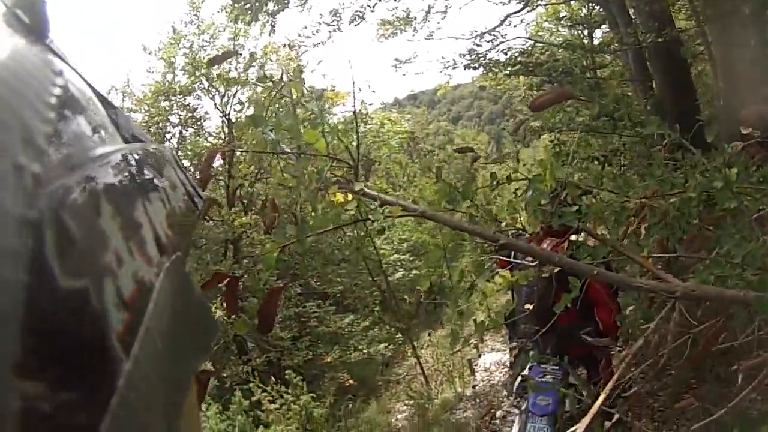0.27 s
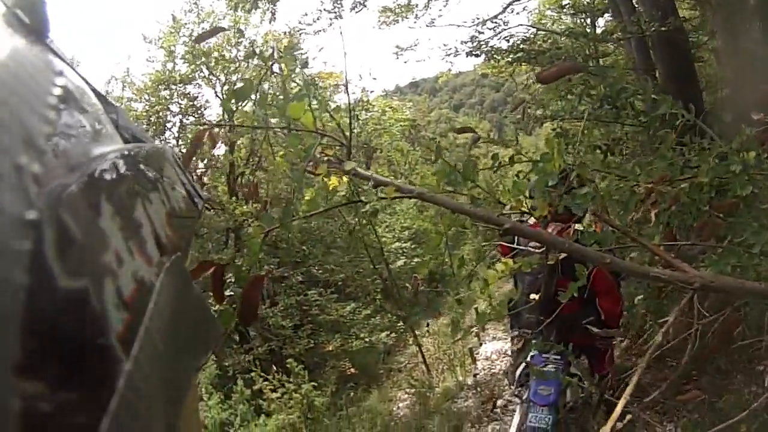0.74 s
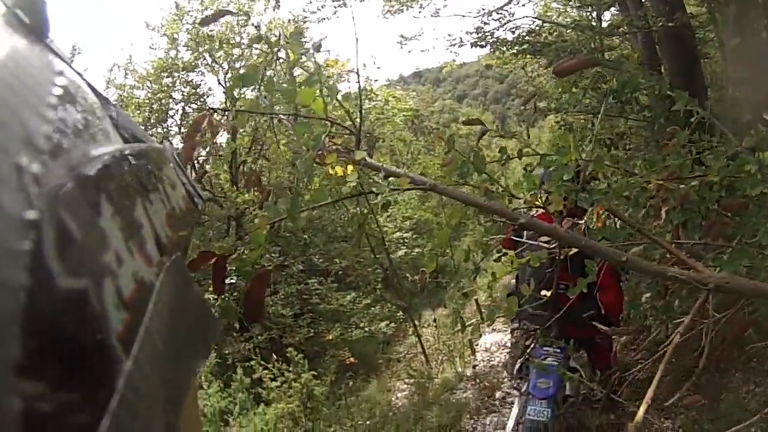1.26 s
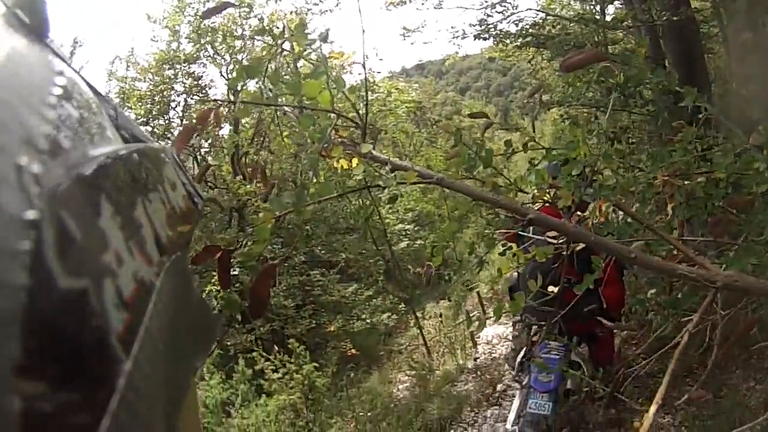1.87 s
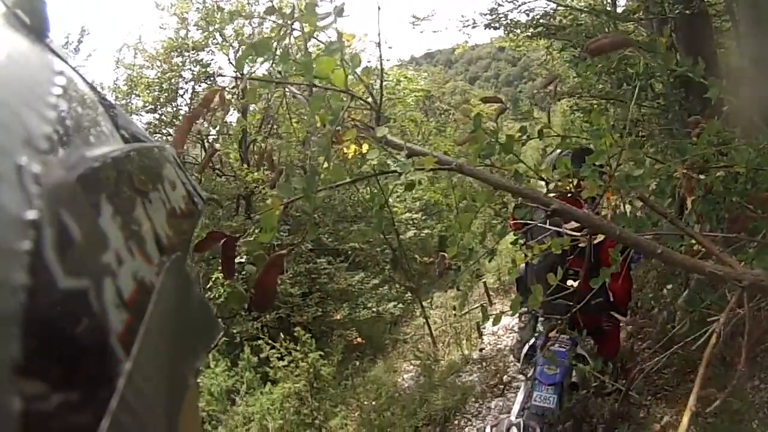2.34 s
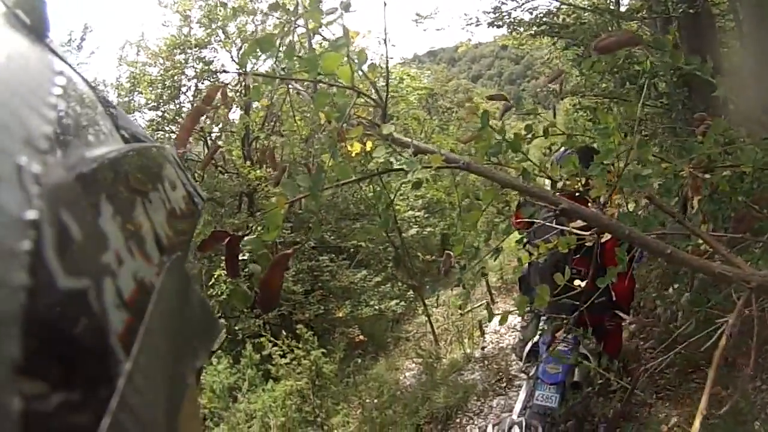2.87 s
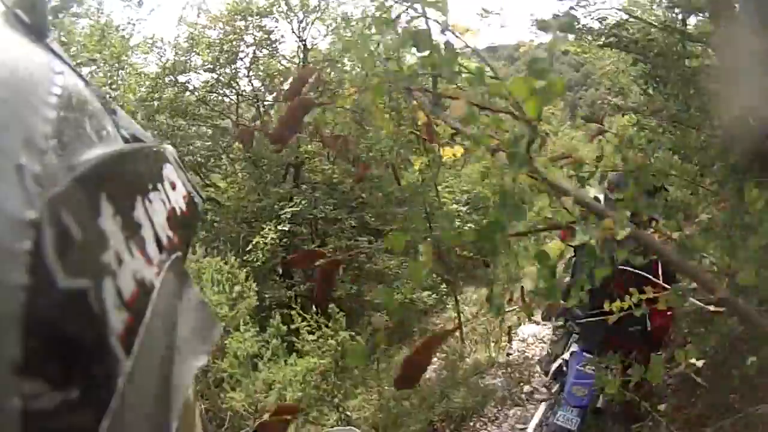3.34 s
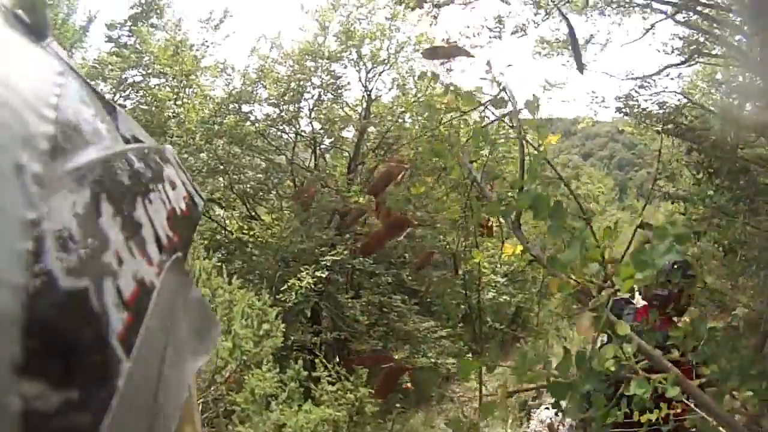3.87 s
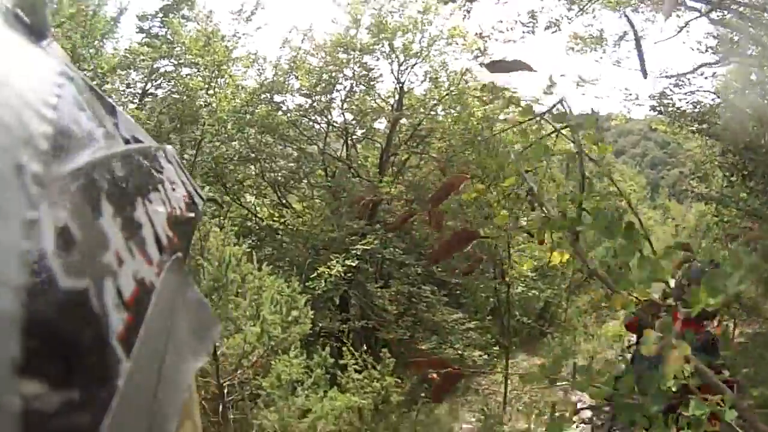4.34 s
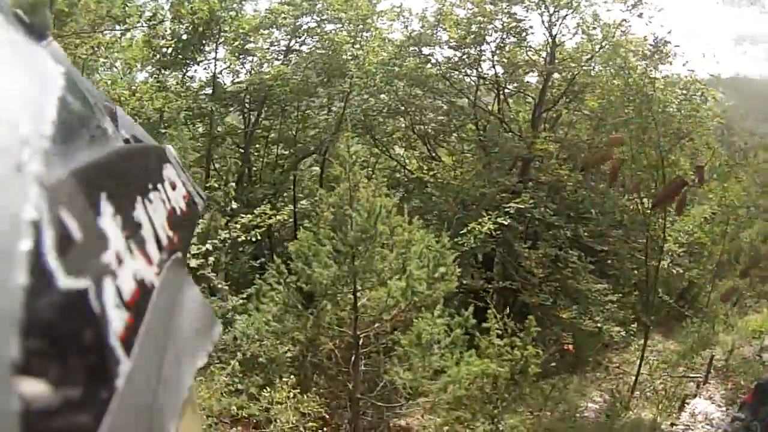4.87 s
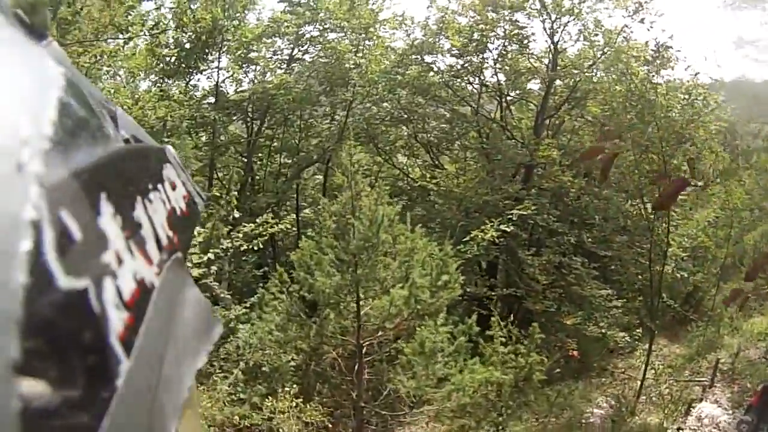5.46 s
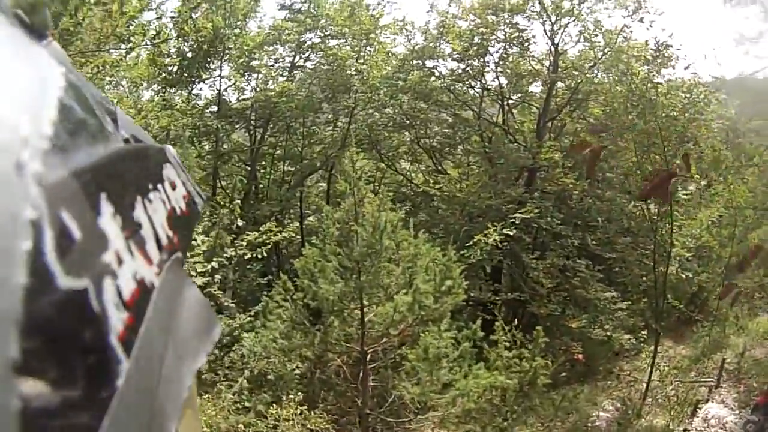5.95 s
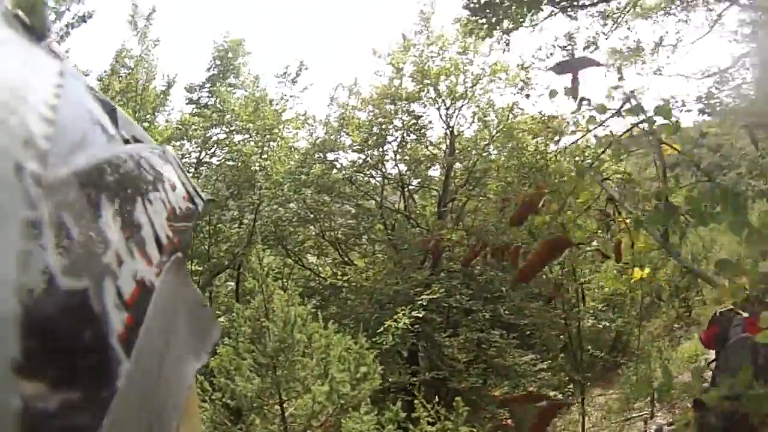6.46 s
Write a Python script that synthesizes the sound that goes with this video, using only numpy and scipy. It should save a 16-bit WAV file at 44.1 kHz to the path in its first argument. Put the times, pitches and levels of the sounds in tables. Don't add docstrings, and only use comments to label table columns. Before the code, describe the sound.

A single microphone in a closed plastic case picks up a steady, dull hiss and a barely audible electronic whine around 600 Hz. Weak ticks touch the helmet at 0.2 to 0.4 seconds; around 1.15 to 1.25 a light tap and a sharper click come with a quick leaf flick. Hiss alone continues until soft knocks at 3.2 to 3.4 and a faint approaching rustle. From 3.9 to 4.3 knocks cluster with brushing leaves and a light tug. Between 4.4 and 4.9 it grows loud: sharp snaps, a hard stuttering scrape near 4.7, low rumble and a heavy hollow knock at 4.89. From 5 to 6.1 only slightly brighter hiss and whine remain. At 6.2 snaps and a faint scrape return, with dense hard cracks from 6.3 to 6.5, leafy ticking and rumble, and one last crack near 6.7. Everything is close, dry and coarse, with limited treble.

```python
import sys
import numpy as np
from scipy import signal
from scipy.io import wavfile
from scipy.ndimage import uniform_filter1d

SR = 44100
rng = np.random.default_rng(int(sys.argv[2]) if len(sys.argv) > 2 else 0)


def nominal_scale(level):
    x = np.asarray(level, float) / 20
    return 10 ** x


def put_to_file(sound):
    columns = np.atleast_2d(sound).T
    safe = np.clip(columns, -1, 1)
    whole_steps = np.round(safe * 32767)
    wavfile.write(sys.argv[1], SR, whole_steps.astype(np.int16))


N = 295821

# pitch_hz, t60_s (time to fall by 60 dB), level_db
SHELL = [(745, .018, -9), (915, .024, 0), (1040, .02, -1), (1240, .014, -7)]
LID = [(1500, .011, -2), (1740, .013, 0), (2030, .011, -3)]
CASE = [(2480, .011, -3), (2760, .013, 0), (3020, .012, -1), (3410, .012, -3)]
EDGES = [(3913, 0.0098, 7), (5040, 0.0094, 14), (5447, 0.0077, 13), (6350, 0.011, 9.5), (6733, 0.013, 6.5),
         (8120, 0.011, -2.5), (8500, 0.0041, -7)]
PARTS = (SHELL, LID, CASE, EDGES)


def evened(x):
    return x / np.sqrt(np.mean(x ** 2) + 1e-20)


def read(points, hz):
    f, value = np.transpose(points)
    return np.interp(np.log(hz + 1), np.log(f + 1), value)


def curve(rows, outside=None):
    s, value = np.transpose(rows)
    return np.interp(np.arange(N) / SR, s, value, outside, outside)


def swells(rows, ends_db):
    gain = np.zeros(N)
    for start, top, end, db in rows:
        gain += nominal_scale(curve([(start, db + ends_db), (top, db), (end, db + ends_db)], -200))
    return gain


def add(mix, s, sound):
    place = mix[round(s * SR):][:len(sound)]
    place += sound[:len(place)]


def hiss():
    # time_s, level_db
    hiss_level = [(0.0, -36), (3.85, -36.5), (4.2, -35.5), (6.71, -37)]
    # pitch_hz, level_db (per Hz)
    hiss_colour = [(12, -31), (20, -14.5), (154, -11.5), (217, -13), (588, -2.5), (942, -2), (2070, -16.5),
                   (2910, -17), (3230, -22.5), (5600, -29.5), (8510, -45), (10500, -63.5), (13600, -105),
                   (22000, -120)]
    # pitch_hz, width_hz, level_db
    notches = [(747, 160, 2.5), (316, 130, 4), (2366, 600, 4), (3280, 220, -16), (4860, 400, -10.5),
               (6325, 320, -7.5), (7840, 110, -0.5), (9700, 130, 1)]
    # time_s, boost_db
    head_turn = [(0, 1), (3.3, 0.5), (3.698, 6.5), (5, 8), (6, 6.5), (6.71, 12)]
    opening_hz, opening_width_hz = 4440, 1800

    hop = 256
    frames, hz = N // hop + 5, np.fft.rfftfreq(1024, 1 / SR)
    real, imaginary, patches = rng.standard_normal((frames, 513, 3)).T
    patches = uniform_filter1d(patches, size=14, axis=0)
    patches = evened(uniform_filter1d(patches, size=10, axis=1))
    flicker = evened(uniform_filter1d(rng.standard_normal(frames), size=4))

    colour_db = read(hiss_colour, hz)
    for f, width, db in notches:
        colour_db = colour_db + db / (1 + (2 * (hz - f) / width) ** 2)
    boost_db = np.interp(np.arange(frames) * hop / SR, *np.transpose(head_turn))
    turn_db = boost_db / (1 + (2 * (hz[:, None] - opening_hz) / opening_width_hz) ** 4)

    spectra = real + 1j * imaginary
    spectra = spectra * nominal_scale(colour_db[:, None] + turn_db + 1.19 * patches + .7 * flicker)
    noise = signal.istft(spectra, nperseg=1024, noverlap=1024 - hop)[1][:N]
    return nominal_scale(curve(hiss_level) - 1.5) * evened(noise)


def whine():
    # time_s, pitch_hz
    whine_pitch = [(0, 600.4), (3.6, 608.7), (4.6, 602.3), (6.71, 614.5)]
    partial_levels = [-49, -68.5, -61, -63.5]
    turns = np.cumsum(curve(whine_pitch)) / SR
    tone = np.zeros(N)
    for k, db in enumerate(partial_levels, 1):
        tone += np.sqrt(2) * nominal_scale(db) * np.sin(2 * np.pi * k * turns)
    return tone


def ring(modes, chance):
    detune, scatter_db = .012, 2.5
    t = np.arange(1500) / SR
    sound = np.zeros(len(t))
    for (hz, t60, db), (a, b) in zip(modes, chance):
        fade = nominal_scale(db + scatter_db * b - 60 * t / t60)
        soft_start = 1 - np.exp(-t * hz / 1.3)
        sound += fade * soft_start * np.sin(2 * np.pi * hz * (1 + detune * a) * t)
    return sound


def contacts():
    # time_s, shell level_db, lid_above_shell_db, contact_ms
    knocks = [(.2216, -28, -23, 4.3), (.3603, -31.5, 0.5, 6.1), (1.1348, -23.5, -15.5, 8),
              (1.2525, -8.5, 3.5, 0.81), (3.1727, -20, -5.5, 2.2), (3.3858, -20.5, -9, 5.9),
              (3.8939, -17, -6, 1.5), (3.9178, -19.5, -5, 3.4), (3.947, -17, 3.5, 0.63),
              (3.9552, -13, 8, 0.7), (3.977, -25.5, 5.5, 4.3), (4.0157, -20, -15, 10),
              (4.0502, -20, -6, 5.4), (4.0662, -19.5, -14, 9.5), (4.0829, -23, 0, 2.5),
              (4.101, -27.5, 4.5, 6.8), (4.2936, -13.5, -4.5, 6.9), (4.364, -24, 0, 1.3),
              (4.6752, -14.5, 0.5, 3.2), (4.7103, -9.5, 2, 0.57), (4.7135, -14.5, -2.5, 1.6),
              (4.8866, 1, -11.5, 1.8), (4.8953, -6, -27, 3.3), (4.9076, -26, 5.5, 4.4),
              (6.2163, -24.5, -16, 11), (6.3025, -12, 2.5, 3.8), (6.3206, -30.5, 2.5, 0.61),
              (6.4327, -16.5, -2.5, 0.96), (6.4908, -12, -7.5, 1.1)]
    # time_s, case level_db, edges_above_case_db, contact_ms
    snaps = [(0.3413, -52.5, 12, 4.5), (1.1464, -37, -5, 1.1), (1.2517, -29, 19, 1.1),
             (3.3269, -38, -0.5, 3.1), (3.7845, -54, 19.5, 2.6), (4.297, -38.5, 10.5, 8),
             (4.0657, -32, 6, 3.9), (4.0827, -31, 4, 4.6), (4.147, -48.5, 23, 0.53), (4.2, -45, 27.5, 0.27),
             (4.4113, -22.5, 6.5, 1.9), (4.4646, -6.5, -6, 0.8), (4.5144, -27.5, 6, 0.92),
             (4.5652, -13, -3.5, 1.2), (4.5927, -28, -12.5, 4.6), (4.6225, -25.5, -11.5, 4.7),
             (4.6571, -13, -13, 1.1), (4.6641, -4, -6.5, 0.62), (4.6729, -1.5, -5.5, 0.37),
             (4.6874, -16.5, 0.5, 0.3), (4.7578, -24.5, 3.5, 1.5), (6.1939, -9, -5.5, 0.8),
             (6.3025, -14.5, -9.5, 2.7), (6.3257, -21, -35, 2.4), (6.3666, -9, -20, 1.1),
             (6.3767, -2, -8, 0.69), (6.4105, -8, 4, 2.2), (6.431, -3, -19, 1.2), (6.4908, -5.5, -3.5, 0.6),
             (6.6856, -4.5, 2.5, 2.1)]
    # strongest_slip_s, level_db, rise_db and fall_db per slip
    drags = [
        (4.7122, -5.5, 2, 1.5),
        (6.2198, -29, 1.5, 0.7),
    ]
    knock_leak = [-16, -20]
    snap_leak = [-18.5, -11.5]
    bounce_loss = [-21.5, -19.5, -15.5, -25]
    slip_parts = [-20.5, -4.5, 0, -8]
    bounce_s, bounce_ms = .006, 1.6
    slip_s, slip_ms = .0033, 1.1

    hits = []
    for s, db, up, ms in knocks:
        hits.append((s, np.r_[db, db + up, db + max(up, 0) + np.array(knock_leak)], ms))
    for s, db, up, ms in snaps:
        hits.append((s, np.r_[db + np.array(snap_leak), db, db + up], ms))

    bounces = []
    late = 1 + .25 * rng.uniform(-1, 1, (len(hits), 2))
    for j, (s, db, ms) in enumerate(hits):
        count = 1 if j < len(knocks) else 2
        for k in range(1, count + 1):
            gap = k * bounce_s * late[j, k - 1]
            bounces.append((s + gap, db + k * np.array(bounce_loss), bounce_ms, j))

    slips = []
    order = np.arange(-3, 8)
    uneven = rng.uniform(-1, 1, (len(drags), len(order), 2)) * (order != 0)[:, None]
    for j, ((s, db, rise, fall), own) in enumerate(zip(drags, uneven)):
        for k, (a, b) in zip(order, own):
            slip_db = db + min(rise * k, -fall * k) + b
            slips.append((s + slip_s * (k + 0.29 * a), slip_db + np.array(slip_parts), slip_ms, len(hits) + j))
    return [(*hit, j) for j, hit in enumerate(hits)] + slips + bounces


def touches():
    first_ticks = [49, 27, 10, 4.6]
    tail_db = -25
    lead_s = .0006
    out, t, rows = np.zeros(N), np.arange(1000) / SR, contacts()
    draws = rng.standard_normal((len(rows), 4, 1000 + 14))
    for (s, part_db, ms, spot), draw in zip(rows, draws):
        stutter = np.exp(-(t / (0.00077 * ms)) ** 2)
        stutter += nominal_scale(tail_db) * np.exp(-t / 0.0055)
        stutter *= np.minimum(t / lead_s, 1)
        for modes, db, tick, own, place in zip(PARTS, part_db - 2, first_ticks, draw, draws[spot]):
            force = (draw[0, :1000] ** 3 + 2.0 * own[:1000]) * stutter
            force[26] += tick
            sound = signal.fftconvolve(force, ring(modes, place[1000:].reshape(7, 2)))
            peak = np.sqrt(2 * uniform_filter1d(sound ** 2, size=70).max())
            add(out, s - lead_s, nominal_scale(db) * sound / peak)
    no_bass = signal.butter(4, 620, "high", fs=SR, output="sos")
    return signal.sosfilt(no_bass, out)


def rustle():
    # start_s, strongest_s, end_s, level_db
    leaves = [
        (1.05, 1.15, 1.25, -52),
        (1.25, 1.275, 1.35, -48.5),
        (3.1, 3.76, 3.98, -53.5),
        (3.8, 4.01, 4.8, -52),
        (4.4, 4.54, 4.58, -42),
        (4.78, 4.87, 4.95, -48),
        (6.1, 6.33, 7.1, -48),
    ]
    part_levels = [-2.5, 10.5, 7, -2]
    ticks_per_s, spread_db = 700, 4.5
    size = nominal_scale(spread_db * np.minimum(rng.exponential(1, N), 5))
    size = size * (rng.random(N) < ticks_per_s / SR) * swells(leaves, -12)
    spot, out = rng.integers(0, 12, N), np.zeros(N)
    for k in range(12):
        tick = ring(PARTS[k % 4], rng.standard_normal((7, 2)))
        tick = tick / np.linalg.norm(tick)
        out += nominal_scale(part_levels[k % 4]) * signal.oaconvolve(size * (spot == k), tick)[:N]
    return nominal_scale(10) * out


def rocking():
    # start_s, strongest_s, end_s, level_db
    pulls = [
        (4.0, 4.1, 4.2, -51.5),
        (4.3, 4.5, 4.6, -66),
        (4.6, 4.7, 4.9, -39),
        (6.27, 6.43, 6.5, -42),
        (6.55, 6.71, 7.5, -52.5),
    ]
    low_band = signal.butter(3, [18, 60], "band", fs=SR, output="sos")
    rumble = signal.sosfilt(low_band, rng.standard_normal(N))
    return evened(rumble) * swells(pulls, -25)


def scene():
    return np.tile(hiss() + whine() + touches() + rustle() + rocking(), (2, 1))


def rounded(mid, need, finer_db, size):
    # pitch_hz, depth_db
    band_depth = [(60, 1), (500, 3), (1500, 3), (3000, 2), (5000, -1), (9000, -4)]
    # pitch_hz, level_db
    least_steps = [(60, -30), (1000, -22), (3000, -18), (4500, -12), (5500, -13), (7000, -17), (8500, -22),
                   (9500, -28)]
    n, k = np.arange(2 * size) + .5, np.arange(size // 2) + .5
    window = np.sin(np.pi * n / 2 / size)[:, None]
    basis = window * np.cos(np.pi / size * np.outer(n + size / 2, k)) * np.sqrt(2 / size)
    padded = np.pad(mid, (size, 2 * size))
    frames = np.lib.stride_tricks.sliding_window_view(padded, 2 * size)[::size]
    lines, hz = frames @ basis, k * SR / 2 / size

    band = np.unique((np.log(hz + 900) * 17).astype(int), return_inverse=True)[1]
    member = band[:, None] == np.arange(band[-1] + 1)
    band_rms = np.sqrt((lines ** 2 @ member / member.sum(0))[:, band])
    frame_need = np.pad(need, (0, 2 * size), "edge")[::size][:len(lines), None]
    least = frame_need * nominal_scale(read(least_steps, hz))
    step = np.maximum(band_rms / nominal_scale(read(band_depth, hz) + finer_db), least)

    chance = rng.standard_normal((len(lines), band[-1] + 1, 3))
    shared, left, right = chance[:, band].transpose(2, 0, 1)
    apart = (rng.random(len(lines)) > .1)[:, None]
    side_db = 1.2 * apart * np.array([left, right])
    step = step * nominal_scale(3 * shared[:, :1] + 3.6 * shared + side_db)
    kept = np.sign(lines) * np.floor(abs(lines) / step + .41) * step
    halves = (kept @ basis.T).reshape(2, -1, 2, size)
    return (halves[:, 1:, 0] + halves[:, :-1, 1]).reshape(2, -1)[:, :N]


def stored(mid):
    level = np.sqrt(2 * abs(uniform_filter1d(mid ** 2, size=3000, origin=600)))
    drained = np.sqrt(2 * abs(uniform_filter1d(mid ** 2, size=24001, origin=12000)))
    usual = np.median(level)
    need = np.minimum(1.3 * level, 16 * usual) - .3 * usual
    need = np.maximum(need, np.minimum(drained, 1.5 * usual))

    bright = uniform_filter1d(np.diff(mid, prepend=0) ** 2, size=128)
    attack = bright > 9 * uniform_filter1d(bright, size=1024, origin=511)
    near_attack = uniform_filter1d(1. * attack, size=500, origin=100) > 1e-6
    short = uniform_filter1d(1. * near_attack, size=200)
    return rounded((1 - short) * mid, need, 0, size=576) + rounded(short * mid, need, 8, size=128)


def roll_off(x):
    return signal.sosfilt(signal.butter(12, 10960, fs=SR, output="sos"), x)


def record(dry):
    duck_from_db, duck_share, recover_db_per_s = -27, 0.16, 1
    power_db = 10 * np.log10(abs(uniform_filter1d(dry[0] ** 2, size=6001, origin=3000)) + 1e-12)
    fall = np.arange(N) * recover_db_per_s / duck_share / SR
    held_db = np.maximum.accumulate(power_db + fall) - fall
    duck_db = duck_share * np.maximum(held_db - duck_from_db, 0)
    mid = np.tanh(dry[0] / nominal_scale(duck_db) / 0.84) * 0.97
    treble_limit = signal.firwin(301, 9710, window=("kaiser", 9), fs=SR)
    mid = 1.028 * signal.oaconvolve(mid, treble_limit, "same")
    return roll_off(stored(mid))


dry = scene()
out = record(dry)
put_to_file(out)
```